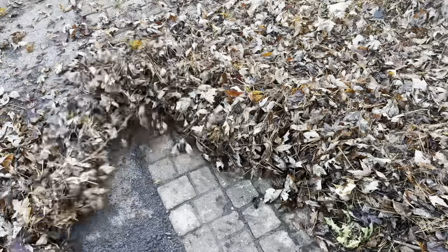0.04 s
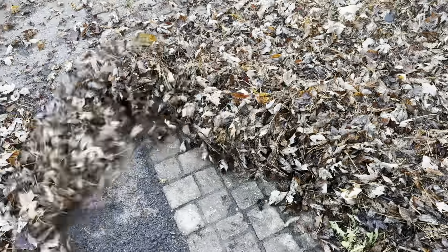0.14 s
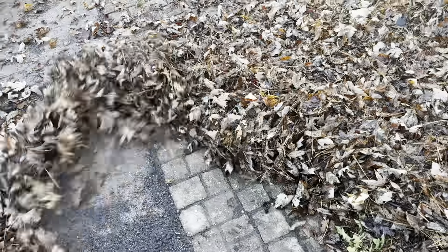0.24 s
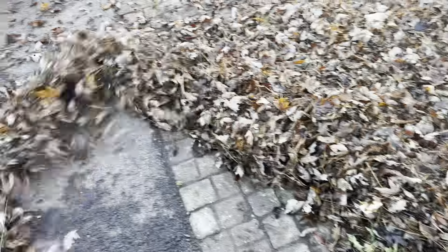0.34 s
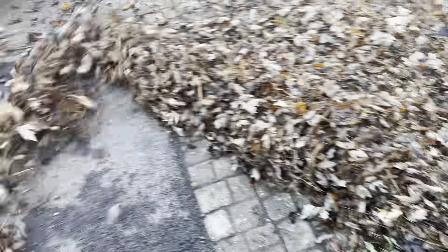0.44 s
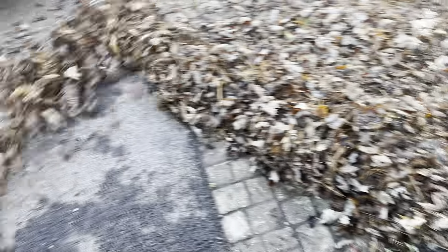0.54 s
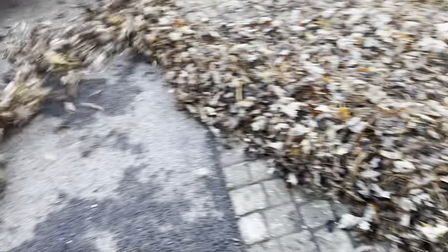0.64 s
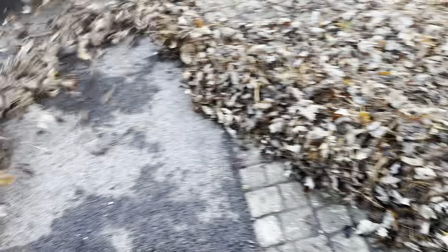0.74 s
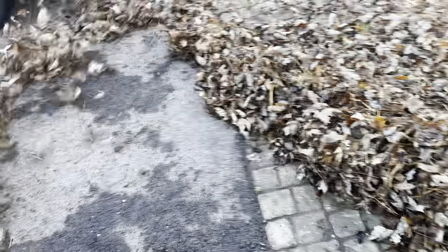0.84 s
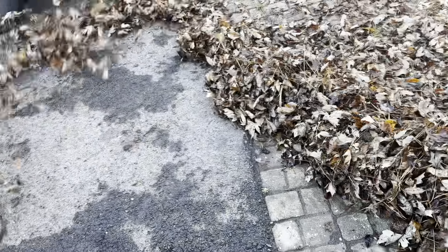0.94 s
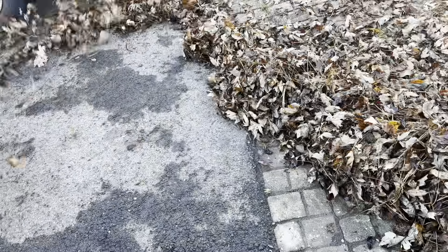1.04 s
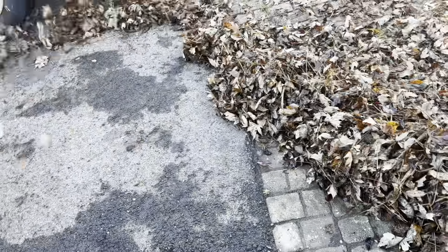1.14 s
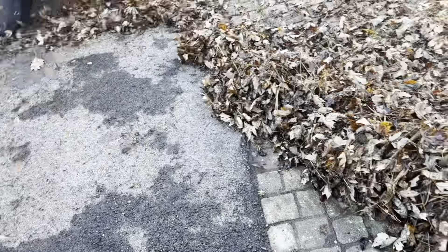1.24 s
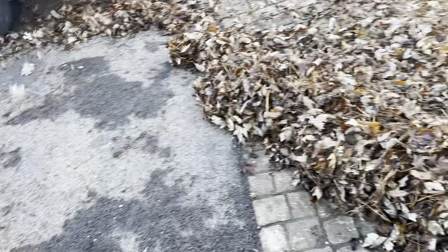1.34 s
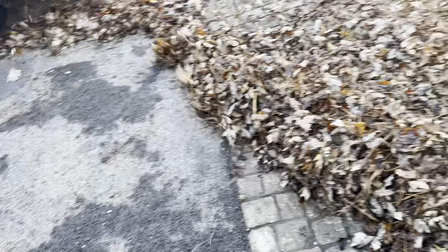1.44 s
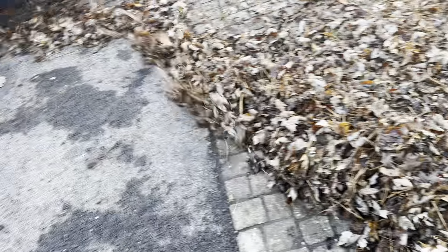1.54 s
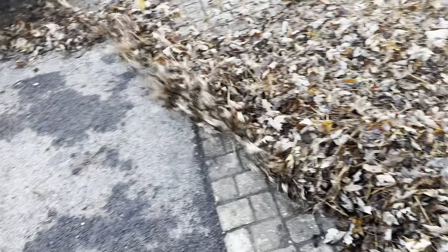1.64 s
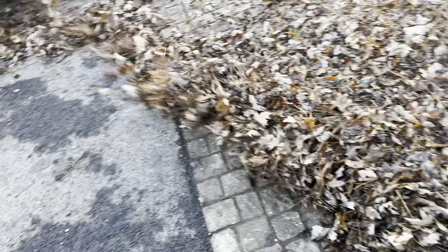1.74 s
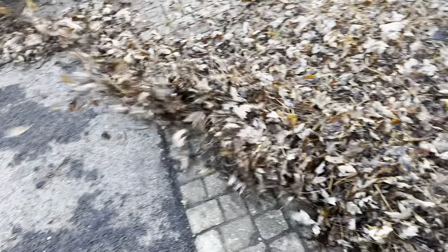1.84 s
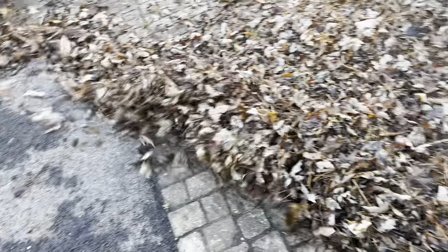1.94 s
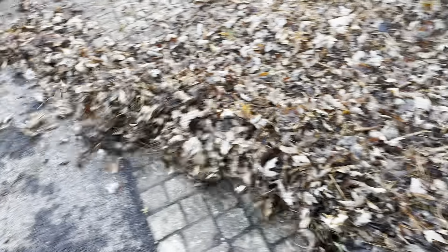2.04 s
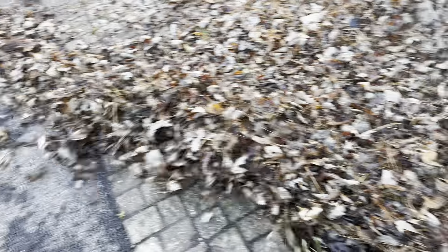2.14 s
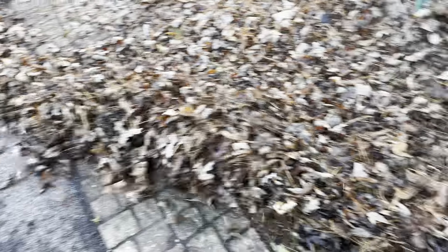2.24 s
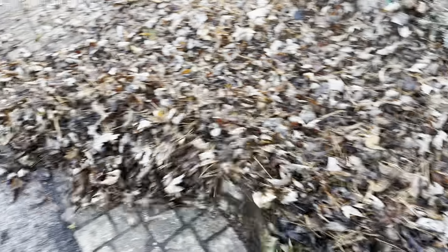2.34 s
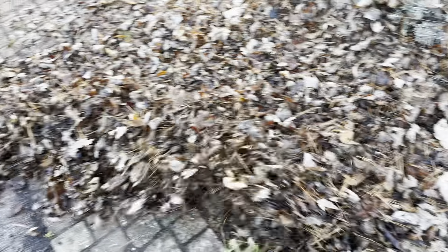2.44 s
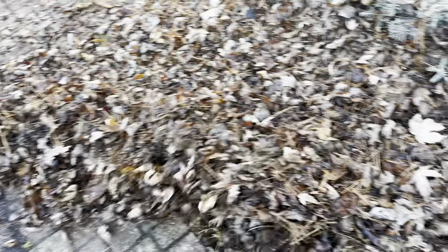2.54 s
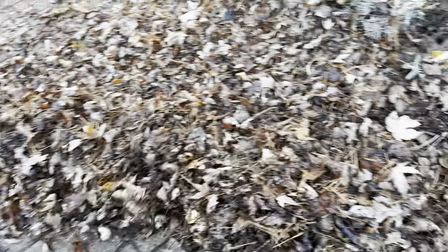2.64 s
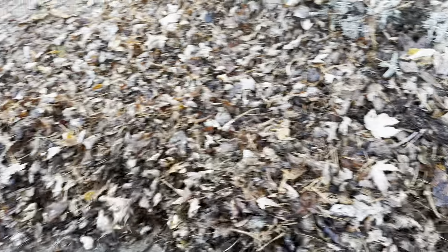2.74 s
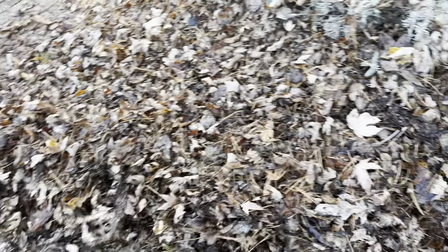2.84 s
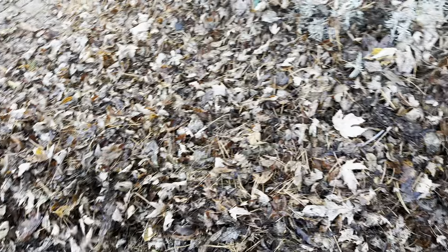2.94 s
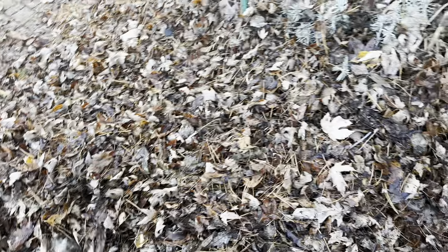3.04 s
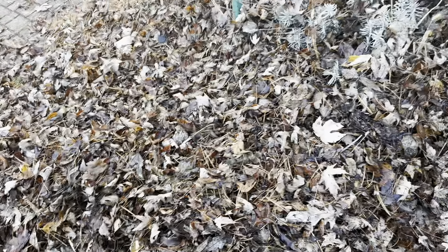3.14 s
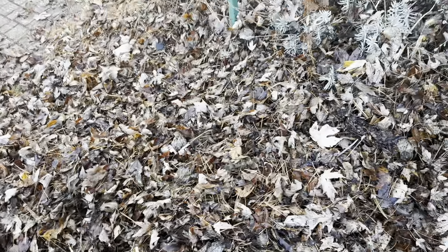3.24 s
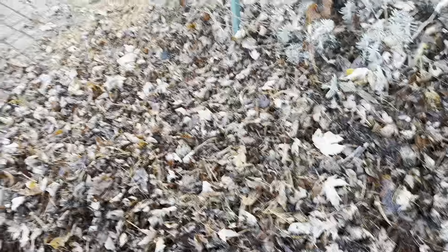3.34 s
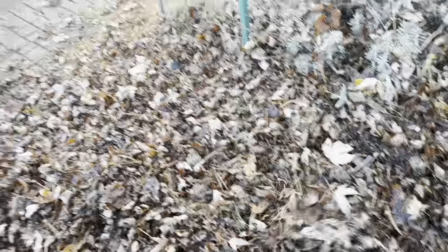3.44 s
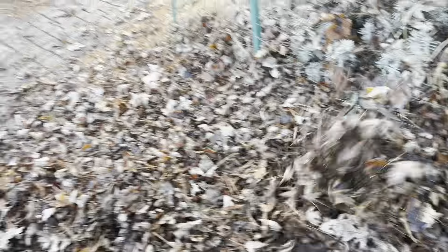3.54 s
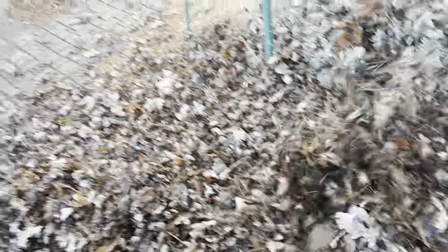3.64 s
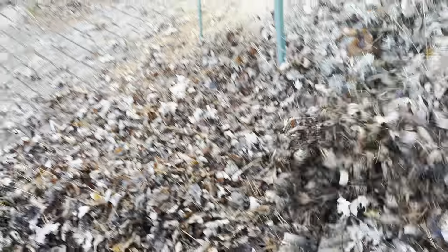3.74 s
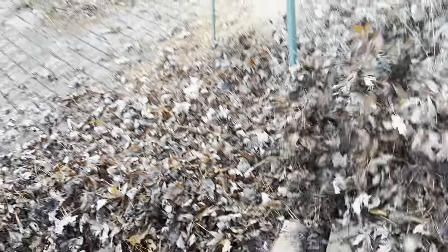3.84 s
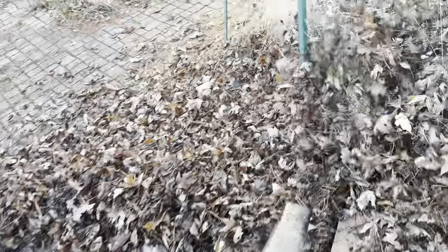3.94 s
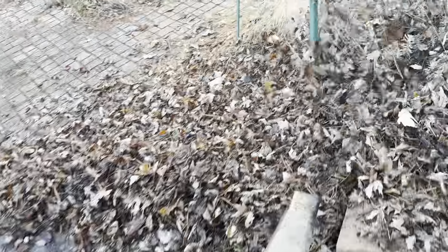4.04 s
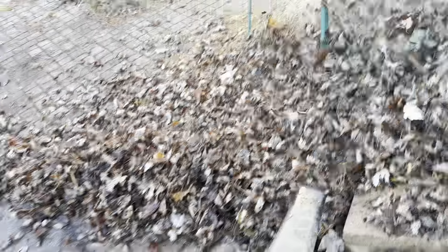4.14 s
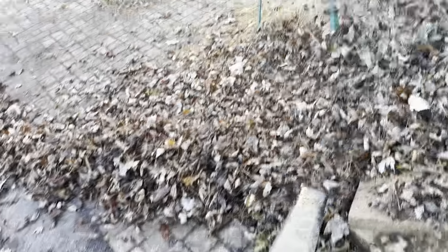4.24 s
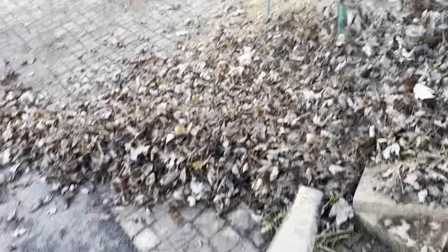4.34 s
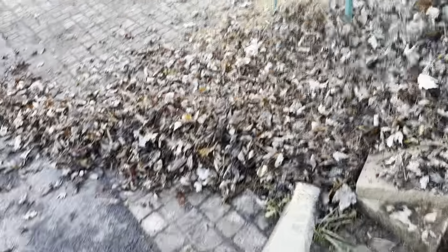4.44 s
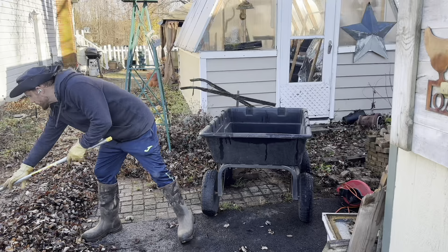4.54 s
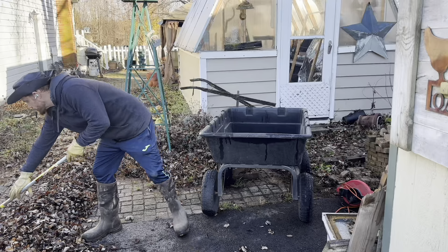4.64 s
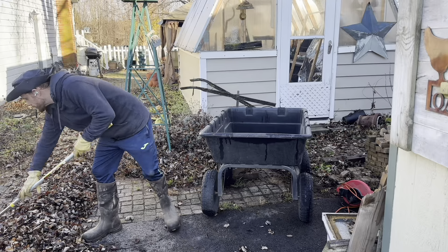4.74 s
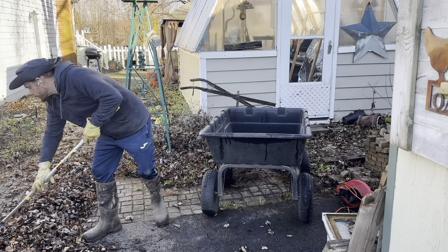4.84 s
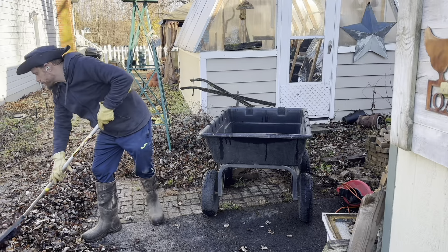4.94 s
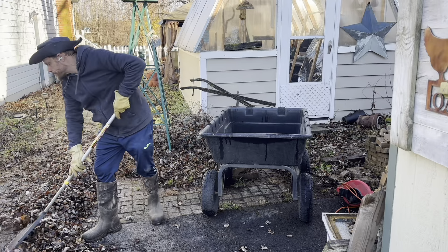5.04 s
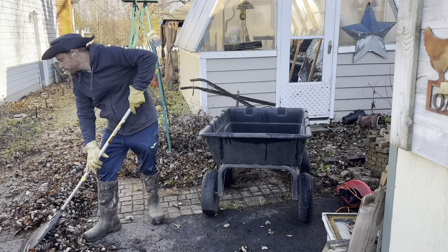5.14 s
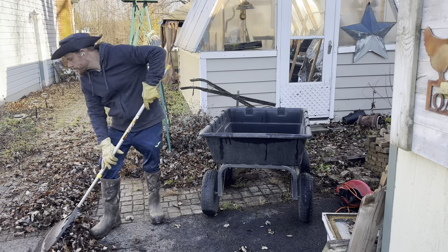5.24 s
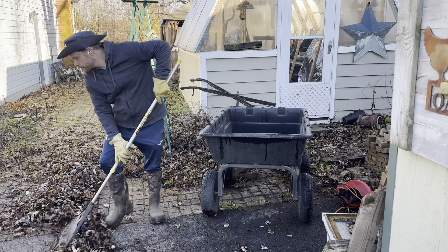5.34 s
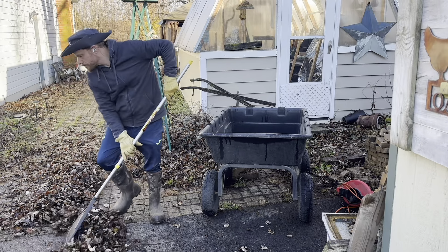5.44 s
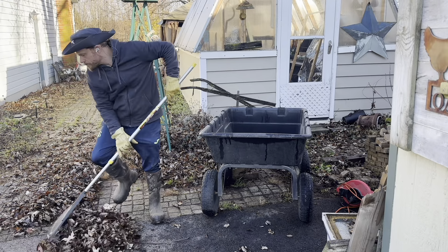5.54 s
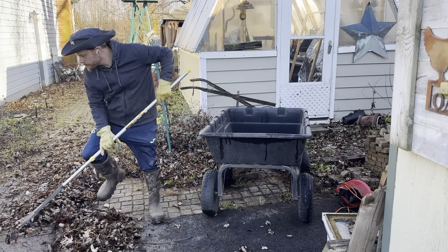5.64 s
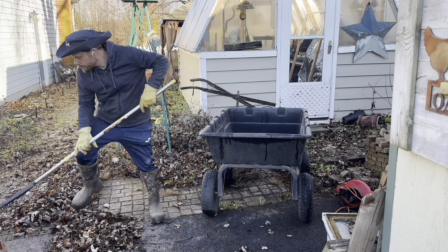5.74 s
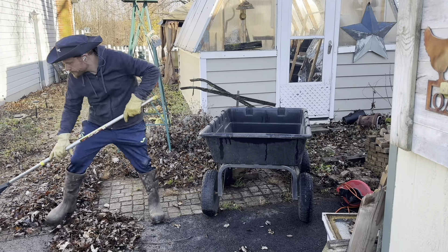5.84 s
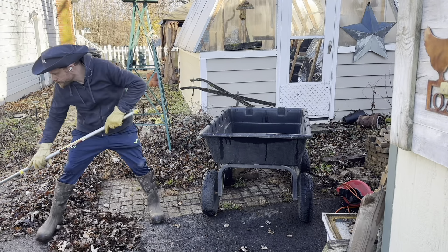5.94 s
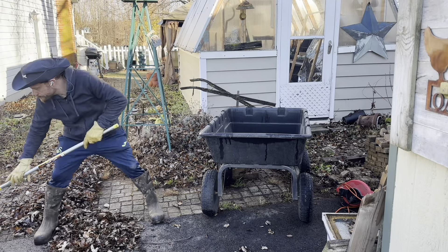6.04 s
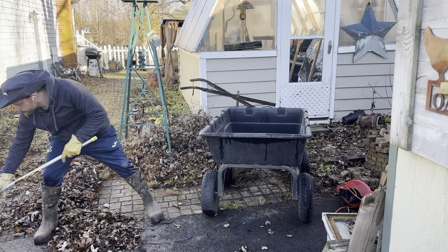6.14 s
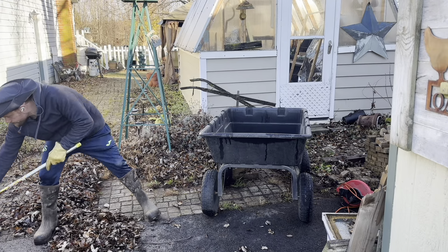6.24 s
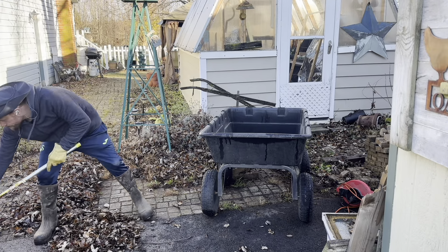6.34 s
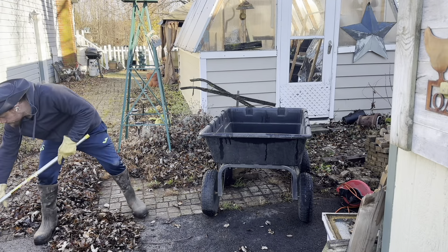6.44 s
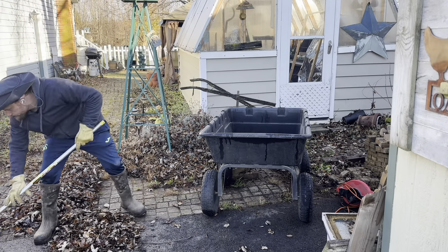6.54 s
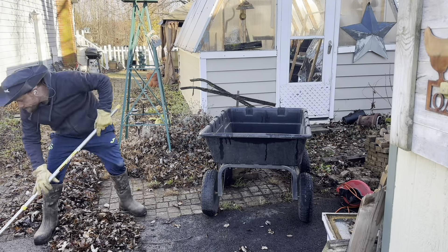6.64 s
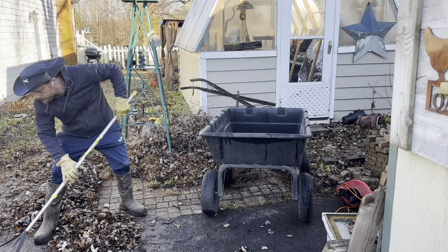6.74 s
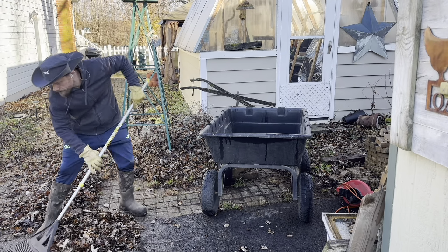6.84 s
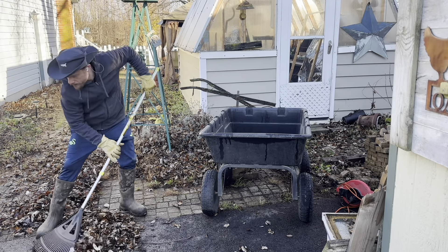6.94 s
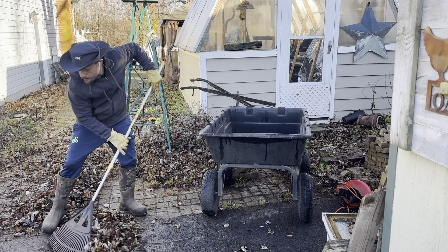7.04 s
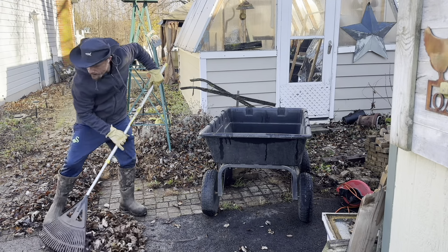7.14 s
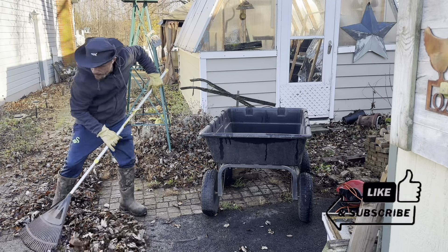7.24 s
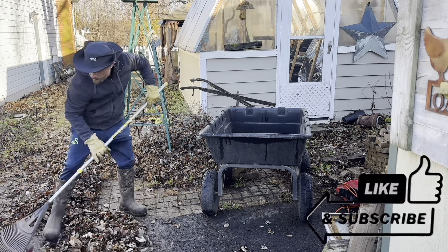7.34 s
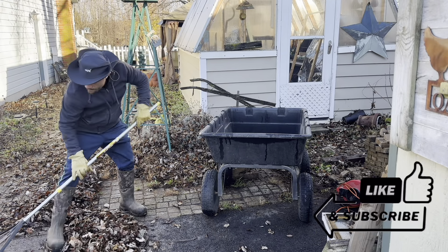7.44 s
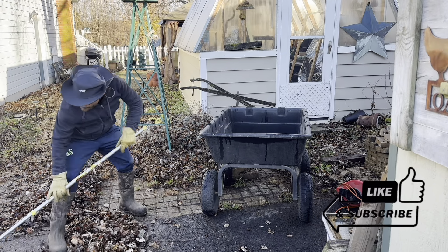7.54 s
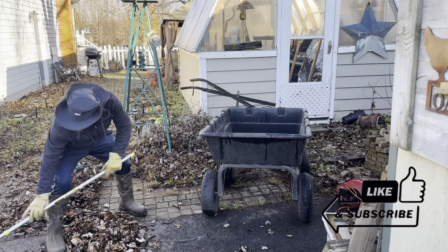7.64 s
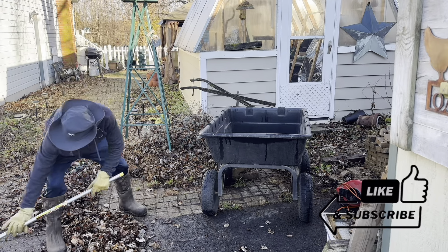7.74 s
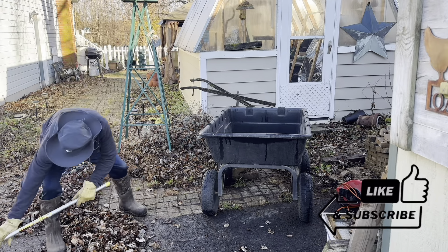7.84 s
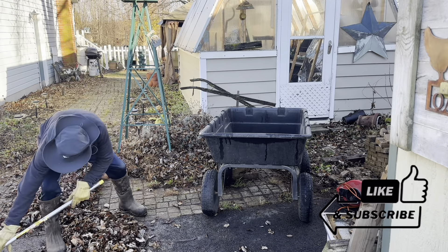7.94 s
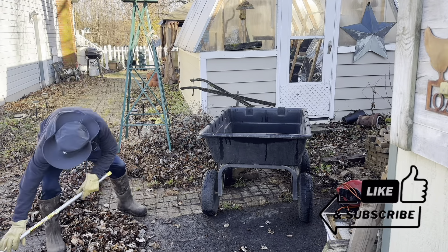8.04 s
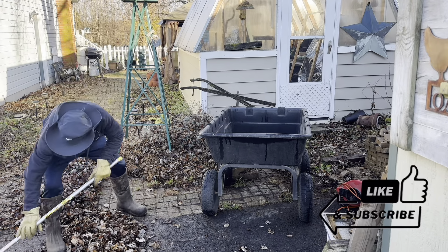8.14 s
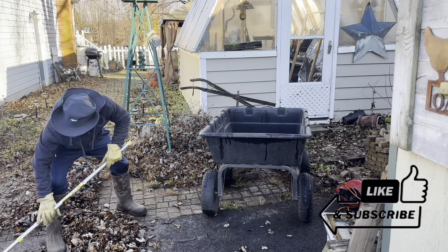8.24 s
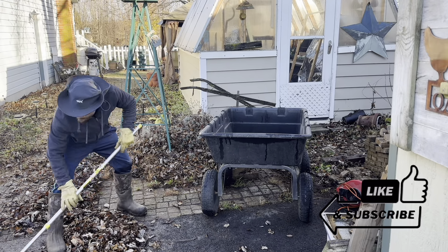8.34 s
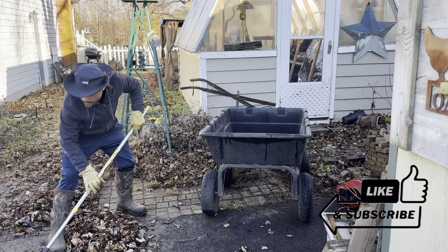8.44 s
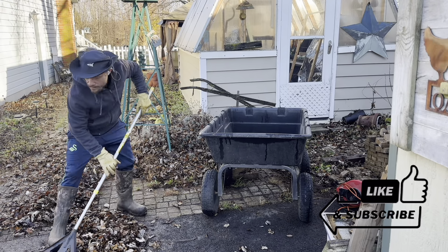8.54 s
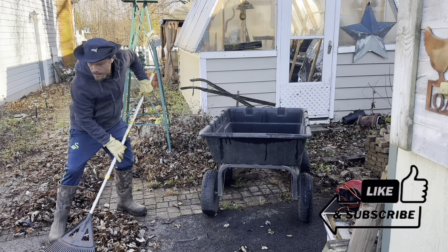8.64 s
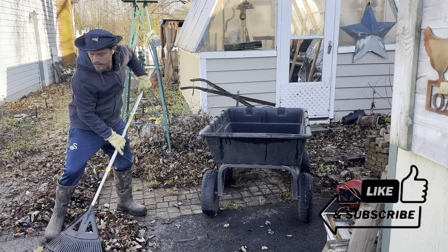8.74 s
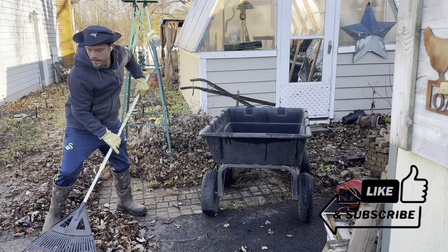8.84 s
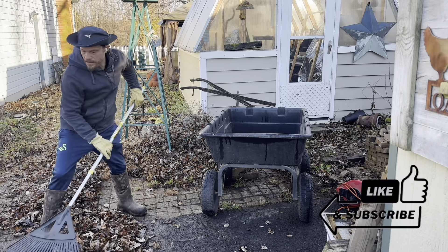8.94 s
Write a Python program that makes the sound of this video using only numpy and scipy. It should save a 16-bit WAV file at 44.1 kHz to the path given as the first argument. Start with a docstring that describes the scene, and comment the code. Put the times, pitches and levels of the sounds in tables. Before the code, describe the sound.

Full-throttle two-stroke blower blasting dry leaves, then a sudden cut to quiet outdoors where a rake drags leaves with sharp cracks and ringing tines.

```python
"""A patio: a two-stroke leaf blower at full throttle drives dry leaves, with two microphone ports close by.
Fan and exhaust are sines on multiples of shaft speed; air, gusts and leaves are filtered noise and clicks.
The scene cuts to asphalt: a rake is dragged three times through leaves, its springy tines ringing from
random clicks, with boot steps and scuffs of decaying noise and tones over a low distant rumble.
"""
import sys
import numpy as np
from scipy import signal
from scipy.fft import rfft, irfft
from scipy.io import wavfile

SR = 44100
rng = np.random.default_rng(int(sys.argv[2]) if len(sys.argv) > 2 else 0)


def transcribe(u):
    """Save the signal u as a 16-bit wav file named by the first command-line argument.

    u: samples, shape (n,) or (channels, n), limited to [-1, 1]; the rate is SR.
    q: integer samples, one column per channel.
    """
    v = np.clip(np.atleast_2d(u).T, -1, 1)
    q = np.round(v * 32767).astype(np.int16)
    wavfile.write(sys.argv[1], SR, q)


N = 396900
T = np.arange(N) / SR
HZ = np.maximum(np.fft.rfftfreq(N, 1 / SR), 1)
CUT_S = 4.542  # the blower ends and the raking scene begins

# All levels are relative, before the mixing gains; spectrum levels are per Hz.
# air stream and exhaust: start_s, roar_db, blown_leaf_hiss_db, exhaust_hum_db
JET = [(0.0, -25, -30.6, -34), (0.13, -27, -31.5, -35), (1.3, -26.5, -32.5, -34.5), (1.84, -27, -33.1, -37),
       (2.45, -25, -31.5, -36), (3.46, -25, -30.5, -35), (3.91, -25.5, -35, -38.5), (4.31, -26.5, -33, -39),
       (4.53, -25.5, -34.1, -42)]
# spectrum of the bulk of the heap: freq_hz, level_db
LEAF_BULK = [(100, -16), (200, 0.5), (330, -1.5), (600, -1), (850, 0.5), (1700, 1), (2400, -3), (4000, -28),
             (8000, -67)]
# spectrum of tines scraping through leaves: freq_hz, level_db
SCRAPE = [(900, -22.5), (2000, -13.5), (2800, -2.5), (3600, -3), (4700, 3), (5900, -0.5), (7000, -2),
          (8100, -5.5), (9500, -9), (12000, -34)]
# spectrum of crisp leaf edges: freq_hz, level_db
CRISP = [(4000, -26), (7000, -14), (8300, -10), (9200, 3.5), (9900, 1), (10800, -10.5), (13000, -13.5),
         (15500, -24)]


def undb(db):
    """Decibels to gain."""
    return 10 ** (np.asarray(db) / 20)


def unit(x):
    """Scale to rms 1; of a mid-side pair the mid counts."""
    return x / np.sqrt(np.mean(np.atleast_2d(x)[0] ** 2))


def curves(rows):
    """Each column of a table, sample by sample."""
    s, *columns = np.transpose(rows)
    return [np.interp(T, s, c) for c in columns]


def over_hz(rows):
    """Each column of a table along log frequency."""
    f, *columns = np.transpose(rows)
    return [np.interp(np.log(HZ), np.log(f), c) for c in columns]


def colour(x, spectrum):
    """Filter by (Hz, dB) points, keeping the power of white noise."""
    return irfft(rfft(x) * unit(undb(over_hz(spectrum)[0])), N)


def ring(x, modes):
    """Pass through a set of resonances (Hz, width Hz, dB) and scale to rms 1."""
    response = sum(undb(db) / (1 + 1j * (HZ ** 2 - f ** 2) / (HZ * width)) for f, width, db in modes)
    return unit(irfft(rfft(x) * response, N))


def walk(rate):
    """Smooth chance with spread 1 that changes about rate times a second."""
    return unit(irfft(rfft(rng.standard_normal(N)) * np.exp(-(HZ / rate) ** 2), N))


def noise():
    """Unrelated mid and side noise."""
    return rng.standard_normal((2, N))


def hump(middle, half_length):
    """A smooth rise and fall that peaks at 1."""
    return np.exp(-((T - middle) / half_length) ** 2)


def burst(start, t60, rise):
    """Envelope of a blow: quick rise, exponential fall."""
    age = np.maximum(T - start, 0)
    return (1 - np.exp(-age / rise)) * undb(-60 * age / max(t60, .005))


def clicks(rate, spread_db):
    """Random clicks as mid and side, exponentially spread in dB, with random signs in each."""
    size = undb(spread_db * np.minimum(rng.exponential(size=N), 5))
    size = size * (rng.random(N) < rate / SR)
    return unit(size * rng.choice([-1, 1], (2, N)))


def crackle(rate, spread_db, smear_db, smear_s):
    """Leaf fractures: each rings briefly in its own octave, then scatters through the pile as a short hiss."""
    out, keep = 0, np.exp(-1 / (smear_s * SR))
    for f in np.geomspace(400, 12800, num=6):
        grains = clicks(rate, spread_db) * undb(1.74 * walk(28))  # leaves of one size break in clusters
        scatter_power = signal.lfilter([1 - keep], [1, -keep], grains[0] ** 2)
        scatter = np.sqrt(scatter_power) * noise()
        octave = 1 + 1j * (HZ / f - f / HZ) * np.sqrt(2)
        out = out + rfft(grains + undb(smear_db) * scatter) / octave
    return unit(irfft(out, N))


def echo(x, strength, dull_hz):
    """A duller copy follows by a few ms; its comb slides as the source moves. The sum is scaled to rms 1."""
    # lag of the first reflection behind the direct sound: start_s, lag_ms
    lags = [(0, 2.8), (1.2, 2.98), (1.7, 3.05), (2.4, 2.73), (3.2, 2.79), (3.9, 3.39), (4.5, 3.15),
            (5.0, 1.77), (6.3, 3.37), (6.6, 2.2), (7.0, 1.58), (8.0, 2.74), (8.3, 2.3), (8.7, 1.56)]
    lag = curves(lags)[0] * SR / 1000  # in samples
    dull = irfft(rfft(x) / (1 + (HZ / dull_hz) ** 2), N)
    late = np.array([np.interp(np.arange(N) - lag, np.arange(N), channel) for channel in dull])
    return unit(x + strength * late)


def ports(pair, place):
    """Mid and side to left and right; the side is partly a louder or earlier copy of the mid."""
    side_db, lean, lead = over_hz(place)
    mid, loose = rfft(pair)
    diffuse = np.sqrt(np.clip(1 - lean ** 2 - lead ** 2, 0, 1))
    copied = (lean + 1j * lead) * mid
    side = undb(np.minimum(side_db, 10)) * (copied + diffuse * loose)
    return irfft(np.array([mid + side, mid - side]), N)


def rumble():
    """Low filtered noise with one resonant note drones restlessly from far away, under the raking."""
    # spectrum of the wash: freq_hz, level_db
    wash_spectrum = [(20, -52), (35, -12), (48, -10), (60, -2), (73, -0.5), (88, -7.5), (108, -8.5),
                     (135, -21), (200, -24), (350, -28.5), (900, -40), (2000, -49), (9500, -45),
                     (15000, -63)]
    # strongest note: freq_hz, width_hz, level_db
    drone_note = [(74, 7.8, 0)]
    # the rumble sinks during the rake's pulls: start_s, level_db
    rumble_level = [(4.6, -38), (5.2, -40.5), (5.7, -35), (6.35, -34), (6.75, -41), (7.55, -35.5),
                    (8.25, -43), (9.0, -37)]
    wash = colour(noise(), wash_spectrum)
    drone = unit(unit(wash) + undb(-10.5) * ring(wash, drone_note))
    running = np.clip((T - CUT_S) / 0.0032, 0, 1)
    return drone * undb(curves(rumble_level)[0]) * running


def steps():
    """Rubber boots land: the sole slaps as decaying noise, the hollow boot rings, the yard walls answer."""
    # boots on the paving, heel then sole: start_s, level_db, t60_s
    footfalls = [(5.9494, -24, 0.083), (5.965, -34, 0.07), (7.616, -43, 0.062)]
    # spectrum of the slapping sole: freq_hz, level_db
    sole_spectrum = [(40, -22), (100, 16), (200, 0), (500, 1), (750, 0), (1050, -4), (1400, -9),
                     (2200, -11), (3200, -25), (5000, -26), (12000, -42)]
    # ring of the hollow boot: freq_hz, level_db, t60_s
    boot_modes = [(84, 2, 0.12), (178, -6.5, 0.09), (560, -1.5, 0.043), (786, -7.5, 0.045),
                  (1080, -11, 0.05), (1610, -15, 0.05), (2140, -16, 0.077)]
    yard_db, yard_t60_s, rise_s = -16, 0.3, .0005
    slap, body = 0, 0
    boot = sum(undb(db) * burst(0, t60, rise=.5 / f) * np.sin(2 * np.pi * f * T)
               for f, db, t60 in boot_modes)
    for s, db, t60 in footfalls:
        answer = undb(yard_db) * burst(s, yard_t60_s, rise=0.012)
        slap = slap + undb(db) * np.hypot(burst(s, t60, rise=rise_s), answer)
        body = body + undb(db) * np.interp(T - s, T, boot, left=0)
    return undb(-3.5) * colour(noise() * slap, sole_spectrum) + np.outer([1, 0], body)


def scuffs():
    """A boot slides over grit: noise swells as it presses harder, then stops short."""
    # slides: stop_s, level_db, swell_db_per_s
    slides = [(7.489, -45.5, 330), (7.518, -42.5, 260), (7.553, -53, 300), (7.622, -57, 250)]
    # spectrum of the grit: freq_hz, level_db
    grit_spectrum = [(100, -20), (300, -5), (700, -3), (1050, 0), (1500, -3), (2200, -7), (3000, -19),
                     (10000, -45)]
    fade_db_per_s = 650
    sliding = sum(undb(db + np.minimum(swell * (T - stops), fade_db_per_s * (stops - T)))
                  for stops, db, swell in slides)
    return sliding * colour(noise(), grit_spectrum)


def sharp_cracks():
    """Tines springing free, stalks breaking, the rake landing, a boot striking: bright noise, duller knock."""
    # sharp cracks: start_s, level_db, t60_s, low_part_relative_db
    cracks = [(4.615, -12.5, 0.033, 2), (4.6375, -16.5, 0.042, 7), (4.653, -15, 0.034, 2),
              (4.7815, -15, 0.047, -19), (4.7985, -9, 0.014, -15), (4.975, -15, 0.015, -16),
              (4.988, -31, 0.02, -16), (5.949, -23, 0.049, -15), (6.1475, -33, 0.043, -17),
              (6.2368, -27.5, 0.06, 12), (6.309, -14, 0.081, -3), (6.4605, -11, 0.014, -6),
              (6.5625, -21, 0.018, -8), (6.64, -11, 0.018, -10), (6.7282, -12, 0.022, -8),
              (6.7746, -12, 0.016, -4), (6.915, -15, 0.04, 7), (7.009, -15, 0.019, -6),
              (7.119, -27.5, 0.043, -12), (7.886, -18, 0.05, -8), (7.909, -12.5, 0.053, -0.5),
              (8.113, -9.5, 0.04, -12), (8.284, -14, 0.054, -18), (8.42, -10, 0.035, -14),
              (8.5264, -12, 0.018, -3)]
    bright, dull = np.zeros(N), np.zeros(N)
    for s, db, t60, low_db in cracks:
        envelope = undb(db) * burst(s, t60, rise=0.0011)
        bright += envelope
        dull += undb(low_db) * envelope
    crack = noise() * bright
    knock = undb(-17.5) * colour(noise() * dull, LEAF_BULK)
    return undb(-11.5) * colour(crack, SCRAPE) + undb(-9.0) * colour(crack, CRISP) + knock


def pull(lands, full, eases, fade_db_per_s):
    """The head drops and crushes leaves; the pull builds, holds and fades."""
    swell_db = 14.5  # rise between landing and full force
    build_db = swell_db * np.clip((T - full) / (full - lands), -1, 0)
    drag = undb(build_db - fade_db_per_s * np.maximum(T - eases, 0)) * (T > lands)
    landing = undb(-1.5) * burst(lands, t60=0.61, rise=0.0091)
    return np.hypot(drag, landing)


def raking():
    """Strength of the scrape, of the leaves' bulk and of their crisp edges over all pulls and sweeps."""
    # pulls: land_s, full_force_s, ease_off_s, level_db, fade_db_per_s, bulk_relative_db, crisp_relative_db
    strokes = [(4.61, 4.76, 4.91, -28.5, 76, -5, -5), (6.233, 6.447, 6.893, -27.5, 85, -7.5, -5.5),
               (7.882, 8.058, 8.575, -25.2, 127, -10, -6)]
    # light sweeps nudging the heap: middle_s, half_length_s, level_db, bulk_relative_db, crisp_relative_db
    sweeps = [(5.27, 0.25, -36.5, -4.5, 1), (5.72, 0.17, -55, -8, 2), (5.885, 0.095, -48.5, -10, 2),
              (6.196, 0.054, -56, -22, -2), (7.26, 0.17, -56.5, -14, 5), (7.372, 0.07, -48, -8.5, 2),
              (7.467, 0.059, -42.5, -15, 2), (7.595, 0.065, -52.5, -12, -1), (7.863, 0.07, -59, -10, 0),
              (8.934, 0.41, -50.5, -3, 1)]
    tumble_s = 0.047  # the bulk keeps moving this much longer than the tines
    power = np.zeros((3, N))
    for lands, full, eases, db, fade, bulk_db, crisp_db in strokes:
        tines = pull(lands, full, eases, fade)
        heap = pull(lands, full, eases + tumble_s, fade)
        parts = np.array([tines, undb(bulk_db) * heap, undb(crisp_db) * tines])
        power += (undb(db) * parts) ** 2
    for middle, half_length, db, bulk_db, crisp_db in sweeps:
        levels = undb([db, db + bulk_db, db + crisp_db])
        power += np.outer(levels, hump(middle, half_length)) ** 2
    return np.sqrt(power) * undb(0.5 * walk(11))  # the force wobbles slowly


def raked_leaves(force, bulk_force, crisp_force):
    """Leaves crackle under the tines in scrape, bulk and crisp bands; faint ticks of settling run below."""
    crushing = crackle(rate=1200, spread_db=1.5, smear_db=0.5, smear_s=0.0071)
    lone_cracks = crackle(rate=70, spread_db=0.5, smear_db=0.5, smear_s=0.001)
    leaves = unit(crushing + undb(-10.5) * lone_cracks)
    grip = undb(0.9 * walk(110))  # the tines catch and slip many times a second
    scrape = undb(-3.0) * grip * force * colour(leaves, SCRAPE)
    bulk = undb(-1.5) * bulk_force * echo(colour(leaves, LEAF_BULK), strength=.45, dull_hz=2490)
    crisp = undb(-2.5) * grip * crisp_force * colour(leaves, CRISP)
    settling = undb(-68) * colour(lone_cracks, SCRAPE) * (T > CUT_S)
    return scrape + bulk + crisp + settling


def tine_chatter():
    """Stick-slip clicks excite the springy tines and the fan-shaped head."""
    # resonances of the rake head: freq_hz, width_hz, level_db
    head_modes = [(377, 120, 2), (800, 45, 0)]
    # resonances of the tines, before each group's stretch: freq_hz, width_hz, level_db
    tine_modes = [(3605, 64, 7), (3980, 30, 6), (4280, 110, -1.5), (5010, 60, 7), (7300, 70, 7)]
    tines = 0
    # the tines fan out in length, so each group slips on its own and rings at its own pitch
    for stretch in np.linspace(.955, 1.045, num=4):
        modes = [(f * stretch, width, db) for f, width, db in tine_modes]
        tines = tines + ring(clicks(rate=1200, spread_db=0.0), modes)
    head = ring(clicks(rate=2500, spread_db=3.0), head_modes)
    return undb(-5.0) * unit(tines) + undb(-18.5) * head


def tine_tips(ringing_force):
    """Tips skip over grit with short rings; in flurries several catch at once and rattle free."""
    # short ring of a tip: freq_hz, width_hz, level_db
    tip_modes = [(4640, 860, 0), (7000, 980, -5.5), (9100, 720, -7)]
    # flurries: middle_s, half_length_s, level_db
    flurries = [(4.801, 0.0091, -26), (4.847, 0.012, -24), (6.621, 0.018, -24), (6.638, .008, -24.5),
                (6.838, 0.0084, -23), (6.878, 0.0079, -32), (8.068, 0.014, -25), (8.15, 0.02, -22.5),
                (8.265, 0.027, -28), (8.56, .012, -35)]
    top_hz = 10300  # the ring dies away above this
    ticks = undb(-6.5) * ring(clicks(rate=260, spread_db=1.5), tip_modes)
    catching = sum(undb(db) * hump(middle, half_length) for middle, half_length, db in flurries)
    rattle = catching * ring(clicks(rate=1500, spread_db=-1.5), tip_modes)
    return irfft(rfft(ringing_force * ticks + rattle) / np.hypot(1, (HZ / top_hz) ** 8), N)


def rake():
    """Tines stick and slip, shaking the head, skipping over grit and crushing leaves."""
    force, bulk_force, crisp_force = raking()
    press_db = -23  # scrape level at which the rake bears fully on the ground
    # the ringing grows faster than the scrape as the rake bears down
    ringing_force = force * np.sqrt(force / undb(press_db))
    leaves = raked_leaves(force, bulk_force, crisp_force)
    return leaves + ringing_force * tine_chatter() + tine_tips(ringing_force)


def gusts():
    """Gusts thrown back at the microphone: brief swells of low buffeting noise."""
    # gusts: middle_s, half_length_s, level_db
    blasts = [(1.327, 0.066, -48), (3.403, 0.3, -48), (4.026, 0.1, -40)]
    # spectrum of the buffeting: freq_hz, level_db
    buffet_spectrum = [(20, -15), (40, -5), (75, 0), (130, -5), (300, -27), (1000, -71.5)]
    swell = sum(undb(db) * hump(middle, half_length) for middle, half_length, db in blasts)
    return colour(noise(), buffet_spectrum) * swell


def blown_leaves():
    """Air hisses over the ground and crackles the leaves; returns the hiss and its faint top."""
    # spectrum of the hiss: freq_hz, level_db
    hiss_spectrum = [(900, -23), (1800, -4.5), (2600, -2.5), (4100, -1.5), (4950, -9.5), (5500, 0),
                     (7200, 0), (8900, 0.5), (9800, -5), (10600, -20.5), (11500, -63)]
    # spectrum of the top of the hiss: freq_hz, level_db
    top_spectrum = [(8000, -57), (10500, 2), (12000, 1), (15500, -9)]
    hiss_db = curves(JET)[1]
    crackling = crackle(rate=900, spread_db=1.5, smear_db=-2.0, smear_s=0.00091)
    leaves = undb(0.5) * noise() + undb(-4) * crackling
    hiss = colour(leaves, hiss_spectrum) * undb(hiss_db + 0.7 * walk(10.4))
    top_hiss = colour(leaves[1], top_spectrum) * undb(hiss_db - 15)
    return hiss, np.outer([1, -1], top_hiss)  # the top hiss goes to the side only


def tube():
    """Turbulence blows across the tube's resonances, which rise and sink separately, with the treble cut."""
    # hollow resonances of the blower tube: freq_hz, width_hz, level_db
    tube_modes = [(186, 33, -18), (349, 64, -7.5), (733, 71, -11.5), (1060, 99, -11)]
    hollow, top_hz = 0, 2500
    for f, width, db in tube_modes:
        level_db = db + 1.13 * walk(1.2) + 2 * walk(13)  # slow swell, quicker churn
        hollow = hollow + ring(noise(), [(f, width, 0)]) * undb(level_db)
    return irfft(rfft(hollow) / (1 + (HZ / top_hz) ** 4), N)


def air_roar():
    """Turbulent air roars from the nozzle and off the paving, coloured by the hollow tube."""
    # spectrum of the roar: freq_hz, level_db
    roar_spectrum = [(25, -50), (60, -25.5), (120, -10), (170, -4), (255, -7), (305, -4), (380, -4),
                     (480, 2.5), (590, -3.5), (740, -6.5), (880, -3), (1070, -7.5), (1300, -8),
                     (1950, -10.5), (2500, -16.5), (5000, -31), (12000, -85)]
    stream = echo(colour(noise(), roar_spectrum), strength=.6, dull_hz=1480)
    air = undb(-1.02) * stream + tube()
    return air * undb(curves(JET)[0] + 0.67 * walk(19))


def whine():
    """Twelve fan blades sing over the engine's orders; their octave beats against the order just below it."""
    # shaft speed, before slight jitter: start_s, speed_hz
    shaft_speed = [(0, 121.28), (1.3, 121.47), (2.0, 121.39), (2.82, 121.3), (3.18, 122.62), (3.42, 122.62),
                   (3.7, 121.6), (4.1, 121.44), (4.5, 121.4)]
    # fan tones, swelling apart as the blower swings: start_s, blade_db, lower_of_high_pair_db, upper_db
    fan_levels = [(0.03, -25, -32.5, -32.5), (0.15, -27.5, -41, -31.5), (0.63, -35, -35.5, -29),
                  (0.9, -39, -35.5, -35), (1.06, -48, -37, -33), (1.16, -36.5, -35.5, -42),
                  (1.27, -31.5, -34, -29.5), (1.43, -35, -34, -33.5), (1.52, -39.5, -33, -31.5),
                  (1.7, -33, -32.5, -29.5), (2.06, -30, -36, -29), (2.15, -31, -37, -34),
                  (2.35, -28, -35, -34.5), (2.47, -26, -37, -46.0), (2.55, -28.5, -35, -36),
                  (2.63, -29.5, -36, -41), (2.68, -30.5, -38, -31), (2.76, -31, -42, -36),
                  (2.83, -30, -34.5, -54), (2.95, -25, -33, -32), (3.25, -29.5, -30, -28.5),
                  (3.39, -30.5, -33, -37), (3.47, -41, -34, -35.5), (3.53, -31.5, -34, -40),
                  (3.63, -29, -33.5, -33), (3.78, -28, -36.5, -32.5), (3.95, -32, -37, -29.5),
                  (4.27, -30.0, -38, -27), (4.51, -27.5, -39, -29)]
    # the other engine and fan lines, in the order of other_orders: level_db, full_flare_change_db
    other_levels = [(-44.5, 6), (-52, 0), (-44.5, -10), (-47.5, 13), (-47.5, 10), (-50, -3), (-48, -5)]
    # flares of the shrill overtones as the blower swings: middle_s, half_length_s, strength (0-1)
    flares = [(0.99, 0.087, 0.5), (3.0, 0.13, 0.8), (3.153, 0.069, 0.84), (3.34, 0.1, 0.45)]
    hum_order, fan_orders, other_orders = 2, [12, 23, 24], [3, 22, 25, 36, 48, 60, 72]
    sway_db, sway_per_s, shimmer_db = 3, 7, 1.0  # slow and quick wavering; orders below 20 waver less
    turn = 2 * np.pi * np.cumsum(curves(shaft_speed)[0] * (1 + 0.00058 * walk(22.0))) / SR
    flare = sum(strength * hump(middle, half_length) for middle, half_length, strength in flares)
    lines = [(hum_order, curves(JET)[2]), *zip(fan_orders, curves(fan_levels))]
    for multiple, (db, flare_db) in zip(other_orders, other_levels):
        sway = sway_db * min(multiple / 20, 1) * walk(sway_per_s)
        lines.append((multiple, db + flare_db * flare + sway))
    out, flutter = np.zeros((2, N)), walk(43)  # one flutter shared by all lines
    for multiple, db in lines:
        angle = multiple * turn + rng.uniform(0, 2 * np.pi)
        shimmer = shimmer_db * min(multiple / 20, 1) * walk(24)
        gain = undb(db + 0.41 * flutter + shimmer)
        side_angle = angle + 2.0 * walk(1.17)  # the side drifts in phase
        out += gain * np.sqrt(2) * np.array([np.sin(angle), np.sin(side_angle)])
    return out


def blower():
    """Whine and exhaust, roaring air, blown leaves and gusts run together until the cut."""
    # between the ports: freq_hz, side_minus_mid_db, lean_left (-1..1), left_leads (-1..1)
    blower_place = [(100, -28, 0, 0), (300, -16, 0.086, 0.097), (666, -4, 0.69, 0.13),
                    (1265, -7.5, 0.74, -0.88), (1940, -29.5, 0.15, -0.83), (2710, -3.5, -0.33, -0.39),
                    (4000, -10, 0.23, 0.48), (5000, 6, 0.1, 0.2), (6000, -33, 0.1, 0),
                    (7430, -6, -0.02, -.6), (10260, 3, 0, -1)]
    running = np.clip(np.minimum(T, CUT_S - T) / .002, 0, 1)
    hiss, top_hiss = blown_leaves()
    close = (whine() + air_roar() + hiss + gusts()) * running
    return ports(close, blower_place) + top_hiss * running


def scene():
    """Blowing first, raking after."""
    # between the ports: freq_hz, side_minus_mid_db, lean_left (-1..1), left_leads (-1..1)
    rake_place = [(40, -26, 0, 0.1), (100, -13.5, -0.3, 0.27), (400, -7, 0, 0.0011), (800, -1, 0.15, 0.47),
                  (1600, -2, 0.16, 0.066), (2520, -1, 0.52, 0.15), (4500, -5.5, .3, 0.73),
                  (6200, -6, 0.3, .2), (8300, 9, 0.37, 0.48), (9500, -1, 0.02, 0.78),
                  (10200, -20, 0.082, 0)]
    ground = rumble() + steps() + scuffs()
    return ports(ground + sharp_cracks() + rake(), rake_place) + blower()


def record(dry):
    """The recorder cuts the top with a steep elliptic low-pass."""
    top_hz = 15800
    return signal.sosfilt(signal.ellip(10, .2, 80, top_hz, fs=SR, output="sos"), dry)


dry = scene()
out = record(dry)
transcribe(out)
```